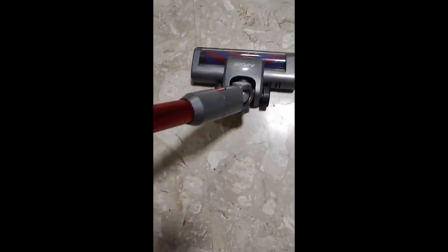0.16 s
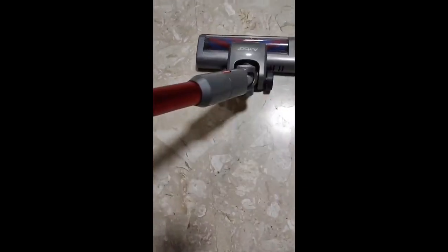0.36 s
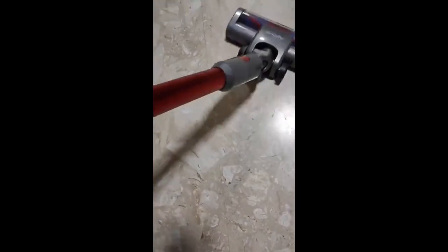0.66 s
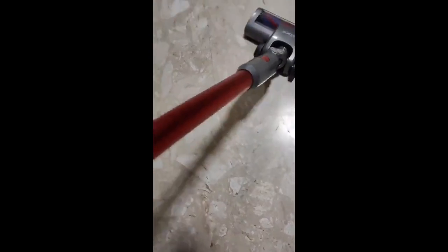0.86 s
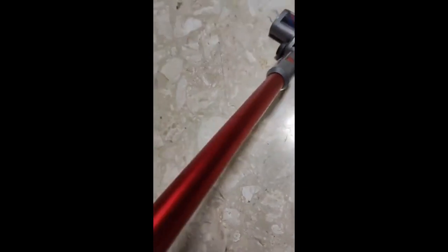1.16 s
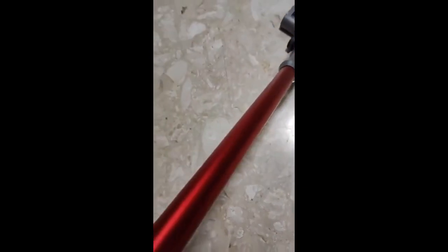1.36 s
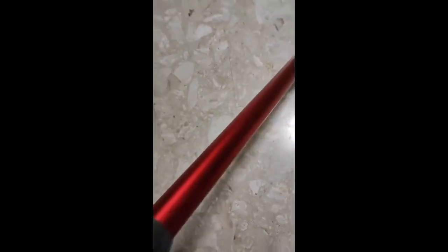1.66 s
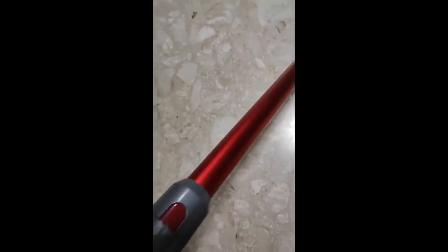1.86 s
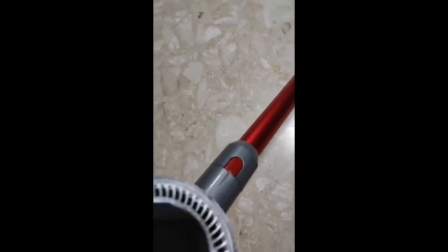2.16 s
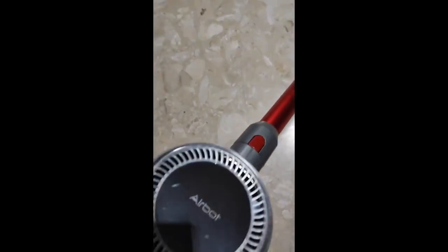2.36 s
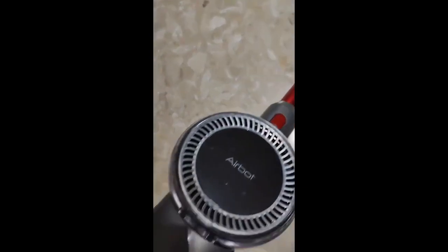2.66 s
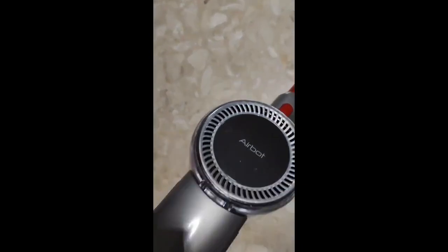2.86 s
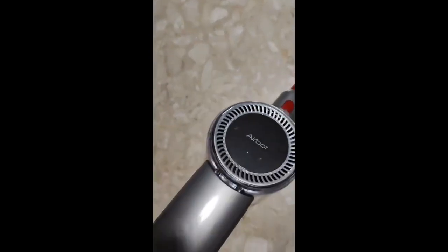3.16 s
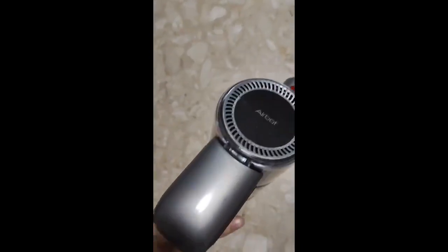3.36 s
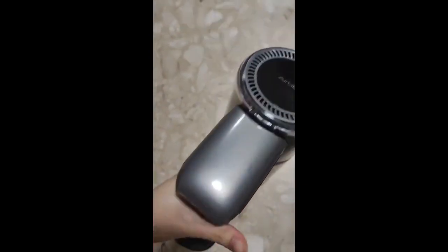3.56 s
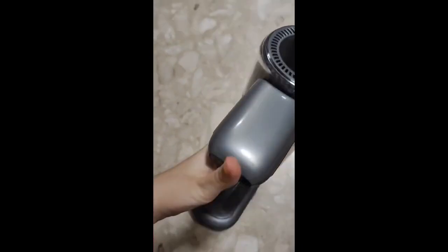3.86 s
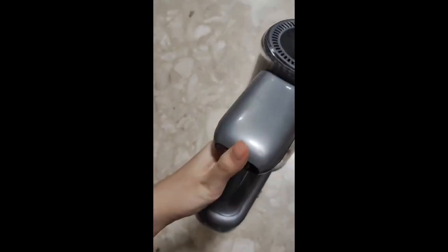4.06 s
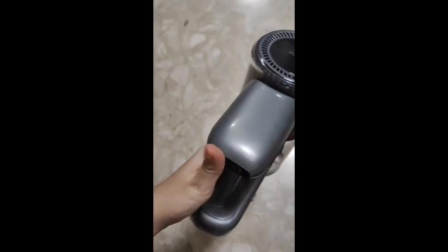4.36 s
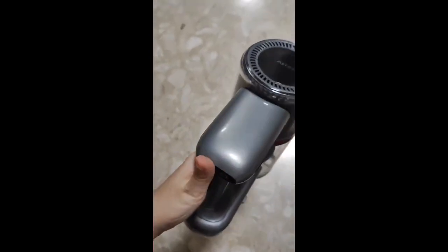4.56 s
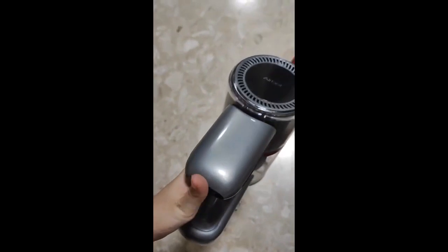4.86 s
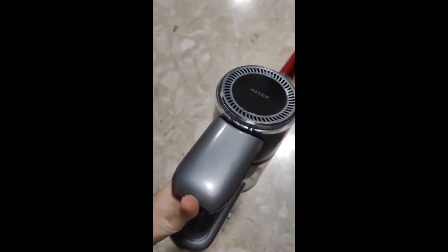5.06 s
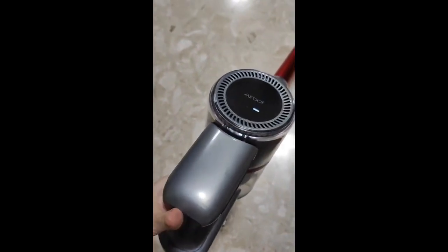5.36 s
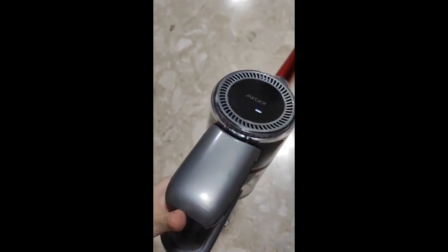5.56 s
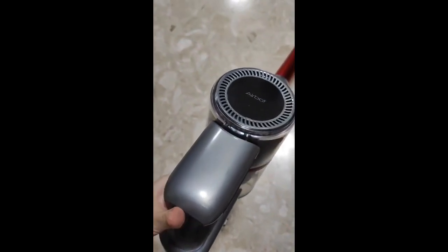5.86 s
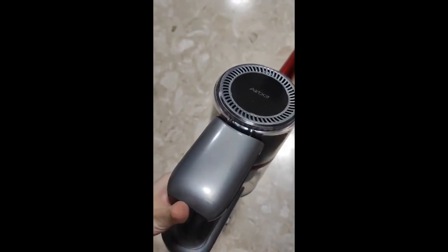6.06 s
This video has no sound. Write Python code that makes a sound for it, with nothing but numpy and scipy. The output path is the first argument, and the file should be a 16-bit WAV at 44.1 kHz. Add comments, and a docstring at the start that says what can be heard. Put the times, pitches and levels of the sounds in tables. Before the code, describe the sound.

A cordless stick vacuum on a hard stone floor indoors. The floor brush is already turning with a low throbbing drone; the suction motor winds up quickly from near silence to a hum and thin whine, holds, then steps to a higher pitch with stronger air rush. A close handheld stereo microphone moves along the wand to the motor.

```python
"""A suction motor spins up in a cordless stick vacuum, settles, then steps to its higher power.
Its unbalanced shaft hums, a seven-blade impeller whines, and the swirl behind it adds wavering tones.
Air rushes and hisses through the machine; a floor brush, already turning, drones and rumbles on stone.
Two microphones move along the wand to the motor; reflections make the tones flutter as they glide."""
import sys
import numpy as np
from scipy import signal
from scipy.fft import rfft, irfft, next_fast_len
from scipy.io import wavfile
from scipy.ndimage import uniform_filter1d, map_coordinates

SR = 44100
rng = np.random.default_rng(int(sys.argv[2]) if len(sys.argv) > 2 else 0)


def generate_wav(sig):
    """Save sig (samples, or channels by samples) to the path in sys.argv[1] as 16-bit PCM at SR."""
    pcm = np.round(np.clip(np.atleast_2d(sig).T, -1, 1) * 32767).astype(np.int16)
    wavfile.write(sys.argv[1], SR, pcm)


N = 274743
TIME = np.arange(N) / SR
LOW_POWER_HZ, HIGH_POWER_HZ = 401.1, 513.6  # shaft turns per second at the two settings


def undb(db):
    """Amplitude gain is ten to the power of decibels over twenty."""
    return 10 ** (np.asarray(db) / 20)


def curves(table):
    """Linear interpolation in time of every column after the first."""
    time_s, *columns = np.transpose(table)
    return [np.interp(TIME, time_s, column) for column in columns]


def over_hz(table, hz):
    """Interpolation of a (frequency, value) table on a logarithmic frequency axis."""
    points, values = np.transpose(table)
    return np.interp(np.log(hz + 1), np.log(points), values)


def walk(rate):
    """Band-limited random fluctuation: spread 1, changing about rate times a second."""
    knots = rng.standard_normal(4096)
    coarse = TIME[::32]
    path = map_coordinates(knots, [coarse * rate], mode="wrap")
    return np.interp(TIME, coarse, path / path.std())


def angle(hz):
    """Phase is the time integral of angular frequency."""
    return 2 * np.pi * np.cumsum(hz) / SR


def tone(phase, db):
    """A sine's peak is the square root of two times its rms level."""
    return np.sqrt(2) * undb(db) * np.sin(phase)


def scattered(phase, db, rate, share, lead=0):
    """A coherent tone, leading on the left, shares its energy with a randomly scattered field."""
    share = np.clip(share, 0, 1)
    sides = []
    for side_phase in (phase + lead, phase):
        in_phase = np.sqrt(2 * (1 - share)) + np.sqrt(share) * walk(rate)
        quadrature = np.sqrt(share) * walk(rate)
        sides.append(in_phase * np.sin(side_phase) + quadrature * np.cos(side_phase))
    return undb(db) * np.array(sides)


def noise(colour, flicker_db, flicker_rate, count=1):
    """Turbulence as partly coherent stereo noise, rms 1, in count flickering bands an octave."""
    # likeness of the two sides of the noise: (frequency_hz, coherence, left_lead_rad)
    likeness = np.array([(30, .7, 0), (120, .98, 0), (300, .95, 0), (550, .85, .3), (850, .55, 1.5),
                         (1100, .55, 2.8), (1650, .5, 3), (1950, .2, 3), (2650, .5, 3.2), (3400, .35, 4.7),
                         (4100, .55, 6.1), (5000, .3, 6.7), (6300, .3, 9), (8000, .1, 11)])
    size = next_fast_len(N, real=True)
    hz = np.arange(size // 2 + 1) * SR / size
    coherence = np.clip(over_hz(likeness[:, [0, 1]], hz), 0, .99)
    lead = over_hz(likeness[:, [0, 2]], hz)
    left, other = rfft(rng.standard_normal((2, size))) * undb(over_hz(colour, hz))
    right = coherence * np.exp(-1j * lead) * left + np.sqrt(1 - coherence ** 2) * other
    sides = np.array([left, right], dtype=np.complex64)
    place = count * np.log2(np.clip(hz, colour[0][0], colour[-1][0]))
    out = 0
    for k in range(int(place[0]), int(place[-1]) + 2):
        weight = np.maximum(1 - abs(place - k), 0).astype(np.float32)  # overlapping triangles
        band = irfft(sides * weight, size)[:, :N]
        out = out + band * undb(flicker_db * walk(flicker_rate))
    return out / out.std()


def pan(db):
    """A level difference, split evenly between left and right gains."""
    return undb(np.array([[db], [-db]]) / 2)


def delayed(side, delay_s):
    """Propagation over a longer path makes a sound arrive later."""
    return np.interp(TIME - delay_s, TIME, side, left=0)


def reflections(x, share, longest_s, sway_ms, count):
    """Multipath interference: count echoes a side, whose path lengths change as the hand sways."""
    echoes = np.zeros((2, N))
    for k in range(2 * count):
        delay_s = rng.uniform(.1, 1) * longest_s + sway_ms / 1000 * walk(2)
        echoes[k % 2] += delayed(x[k % 2], delay_s)
    return (x + share * echoes / np.sqrt(count)) / np.sqrt(1 + share ** 2)


def shaft_speed():
    """First-order lag: the speed nears each power setting exponentially, with a soft-starting step."""
    switch_on_s, spin_up_s = -.035, .375  # start and time constant
    step_at_s, step_ease_s, step_settle_s = 2.378, .087, .175
    creep_at_s, creep_hz_per_s = 4, 0.73  # the speed inches up at the end
    spin_up = 1 - np.exp(-np.maximum(TIME - switch_on_s, 0) / spin_up_s)
    since_step = step_ease_s * np.logaddexp(0, (TIME - step_at_s) / step_ease_s)
    step = 1 - np.exp(-since_step / step_settle_s)
    creep = creep_hz_per_s * np.maximum(TIME - creep_at_s, 0)
    return LOW_POWER_HZ * spin_up + (HIGH_POWER_HZ - LOW_POWER_HZ) * step + creep


def shaft_hum(turn, glide):
    """Rotating unbalance shakes the housing once a turn, a little unsteadily."""
    # hum level at the two microphones, before flicker and echoes: (time_s, left_db, right_db)
    hum_levels = [(0.0, -68, -67), (.17, -58, -55), (0.27, -41, -40), (0.47, -35.5, -25),
                  (0.57, -21.5, -21.5), (1.17, -23.5, -20.5), (1.29, -25.5, -26), (1.79, -26.5, -26.5),
                  (2.4, -19, -19.5), (2.57, -24.5, -24), (2.65, -25, -17), (2.71, -30, -30),
                  (2.89, -25.0, -21), (4.08, -27.5, -25.5), (4.27, -30, -28.5), (4.41, -28.5, -23),
                  (4.67, -40, -24), (5.2, -27, -25), (5.27, -30, -27.5), (6.07, -31, -22), (6.22, -38, -24)]
    left_db, right_db = curves(hum_levels)
    left = tone(turn, left_db + 0.76 * walk(28))
    right = tone(turn, right_db + 0.68 * walk(28))
    echo_share = undb(-40.0) + 0.2 * glide
    return reflections(np.array([left, right]), echo_share, longest_s=0.11, sway_ms=0.78, count=5)


def blade_whine(turn, glide):
    """Blade-passing tone: each blade chops the air, and standing waves and echoes shape the whine."""
    # relative whine level as the microphones pass through standing waves: (time_s, left_db, right_db)
    whine_levels = [(.45, -41, -42), (.6, -41, -40), (.72, -33.5, -33.5), (.82, -31, -34),
                    (.95, -31.5, -32), (1.2, -35, -28), (1.42, -30, -32), (1.48, -35.5, -28),
                    (1.58, -23.5, -24), (1.85, -31.5, -33), (1.97, -30, -26.5), (2.17, -28, -23),
                    (2.24, -28.5, -28), (2.6, -24, -25.5), (2.77, -25.5, -26.5), (3.0, -32, -31.5),
                    (3.2, -28, -27.5), (3.55, -25.5, -27), (3.85, -28.5, -27.5), (3.98, -20.5, -21),
                    (4.33, -33.5, -35), (4.41, -32.5, -33), (4.47, -23.5, -38), (4.56, -24.5, -26.5),
                    (4.67, -29.5, -39), (4.87, -22, -30), (5.01, -17.5, -27), (5.05, -26, -24),
                    (5.12, -22, -22), (5.17, -27, -25), (5.2, -22, -35), (5.26, -20, -23),
                    (5.3, -31.5, -32), (5.39, -23.5, -26), (5.48, -30, -27.5), (5.55, -35, -31),
                    (5.6, -24.5, -43), (5.7, -21.5, -32), (5.8, -27, -31), (5.89, -26, -31),
                    (6.03, -24.5, -30), (6.18, -27, -27.5), (6.23, -22.5, -29)]
    # brief level changes near their nodes: (centre_s, length_s, left_db, right_db)
    nodes = [(1.064, 0.017, -1, -8), (1.359, 0.015, 5, -7), (1.64, 0.05, -8, -16.5),
             (1.707, 0.016, -16, -0.5), (1.807, 0.01, 5, -15), (2.127, 0.032, -5, -12),
             (2.85, 0.018, -12, -3), (2.944, .012, -27.5, -6), (3.063, 0.04, 4.5, -19),
             (3.14, 0.018, -7, 7), (4.233, 0.022, -4, -11), (4.476, 0.035, 0, -15), (4.7, 0.028, 1.5, -10),
             (5.2, .01, 4.5, -15), (5.45, 0.017, -18, 0), (5.75, 0.02, -4, -15), (6, 0.015, 2.5, -12),
             (6.113, 0.027, -7, -5)]
    # phase by which the left side lags the right outside the hollow spells: (time_s, lag_rad)
    whine_lag = [(.7, 2), (.82, 1.3), (.98, 2.3), (1.13, .8), (1.35, 2), (1.5, 1.8), (1.8, 1.6),
                 (2.15, 1.8), (2.4, .9), (3.0, .3), (3.11, 2.2), (3.19, 0), (3.36, 0), (3.42, 1.4),
                 (3.6, 1.6), (3.76, 0), (4.08, 0), (4.18, 1.7), (4.3, 0), (4.62, -.6), (4.72, 1.2),
                 (5.0, 2.3), (5.2, 1.3), (5.45, 1.7), (5.64, 1.2), (5.76, 1.9), (5.88, 1.3), (5.98, 2),
                 (6.1, .3), (6.16, 1.7), (6.23, 4.4)]
    # spells of equal level and opposite phase on the two sides: (start_s, end_s)
    hollow_spells = [(.478, .5), (.547, .568), (.662, .703), (.732, .768), (.873, .903), (.942, .956),
                     (1.002, 1.044), (1.077, 1.094), (1.15, 1.326), (1.383, 1.438), (1.818, 1.862),
                     (3.099, 3.116), (4.17, 4.205), (5.041, 5.178), (5.284, 5.322), (5.466, 5.552),
                     (5.838, 5.855), (5.887, 5.902), (5.935, 5.969), (6.167, 6.202)]
    # late wall echoes: (left_delay_s, right_delay_s, strength in a full glide, 0-1)
    walls = [(.021, .018, .4), (.044, .052, .27)]
    blades, hollow_fade_s = 7, .012
    arrives_s, slowing_s = 3.6, 0.3  # the microphones reach the motor
    crossings_per_s, crossing_db = 15, 1.5  # standing waves crossed on the way

    hollow = sum(1. * ((TIME > start) & (TIME < end)) for start, end in hollow_spells)
    hollow = uniform_filter1d(hollow, size=int(hollow_fade_s * SR))
    sides_db = np.array(curves(whine_levels))
    for centre_s, length_s, left_db, right_db in nodes:
        sides_db += np.outer([left_db, right_db], np.exp(-((TIME - centre_s) / length_s) ** 2))
    even_db = 10 * np.log10(np.mean(undb(sides_db) ** 2, axis=0))  # mean power of the sides
    left_db, right_db = sides_db + hollow * (even_db - sides_db)
    lag, = curves(whine_lag)
    lag = lag + hollow * (np.pi - lag)

    travel = np.clip((arrives_s - TIME) / slowing_s, 0, 1)
    crossing = crossing_db * travel * walk(crossings_per_s)
    flutter = (.7 + glide) * walk(40) + glide * walk(110)
    sides = np.array([tone(blades * turn - lag, left_db), tone(blades * turn, right_db)])
    whine = undb(crossing + flutter) * sides
    # an echo keeps the earlier pitch, so it beats with the direct sound during a glide
    for left_s, right_s, strength in walls:
        echo = np.array([delayed(whine[0], left_s), delayed(whine[1], right_s)])
        share = strength * glide * (1 - hollow)
        whine = (whine + share * echo) / np.hypot(1, share)
    room_share = (.04 + .25 * glide ** 2) * (1 - hollow)
    return undb(1.5) * reflections(whine, room_share, longest_s=0.05, sway_ms=0.15, count=5)


def overtones(hz, turn, power, glide):
    """Resonance: housing modes colour faint shaft harmonics, the higher rougher and treble weaker in glides."""
    # weaker harmonics before the housing; the side difference is left minus right at low power:
    # (shaft_multiple, low_power_db, high_power_db, side_difference_db)
    harmonics = [(2, -44, -51, -8), (3, -42, -47.5, -7), (4, -53, -61, 0), (5, -55, -44.5, 0),
                 (6, -62, -54.5, 0), (9, -61, -61.5, 0), (10, -55, -52, 1), (11, -64, -63, 0),
                 (13, -63, -61, 0), (14, -56.5, -52, 1), (15, -56, -55.5, 1), (17, -69, -73, 0),
                 (18, -69, -72, 0)]
    # housing resonances that the harmonics glide through: (frequency_hz, gain_db)
    housing = [(520, -3.5), (630, 4.5), (730, 5), (800, -2.5), (930, 3), (1100, 4.5), (1190, 0),
               (2600, 2.5), (3100, 7.5), (3300, 8), (3450, 6), (3700, -1), (3950, -1), (5150, 0),
               (5450, 3.5), (5900, 3.5), (6300, 0)]
    left_lead_s = .00024  # the motor's sound reaches the left microphone first
    out = 0
    for multiple, low_db, high_db, side_db in harmonics:
        line_hz = multiple * hz
        treble = np.clip((line_hz - 3500) / 1000, 0, 1)
        power_db = low_db + power * (high_db - low_db)
        db = power_db + over_hz(housing, line_hz) - 3 * glide * treble
        share = .03 + .02 * multiple + .45 * power
        sides = undb(np.outer([1, -1], side_db * (1 - .6 * power)) / 2)
        lead = 2 * np.pi * line_hz * left_lead_s
        out = out + sides * scattered(multiple * turn, db, rate=16 + multiple, share=share, lead=lead)
    return out


def impeller_swirl(turn):
    """Random modulation broadens the tones of the unsteady swirl behind the impeller."""
    # swirl tones: (shaft_multiple, width_hz, relative_level_db)
    swirl_tones = [(1.86, 70.04, -37.5), (5.001, 260.1, -42.5)]
    # level added to them, rising with power, falling as the microphones draw back: (time_s, level_db)
    swirl_level = [(0, -19.5), (2.0, -14.5), (2.5, -2.5), (3.0, 0.5), (4.15, 2), (4.7, -3), (6.23, -2)]
    swirl_db, = curves(swirl_level)
    out = 0
    for multiple, width_hz, db in swirl_tones:
        out = out + scattered(multiple * turn, db + swirl_db, rate=width_hz, share=0.98)
    return out


def airflow():
    """Turbulent flow makes broadband noise: a rush in wand and cyclone, a hiss at the exhaust slots."""
    # relative level of the air: (time_s, rush_db, hiss_db)
    air_levels = [(0, -59, -62.5), (0.55, -44, -49.5), (1.4, -43, -50.5), (2.26, -40.5, -48),
                  (3.0, -38, -45), (4.45, -37.5, -45.5), (4.75, -38, -41.5), (5.9, -40, -44),
                  (6.23, -38, -45)]
    # spectrum of the rush: (frequency_hz, relative_level_db)
    rush_colour = [(110, -27.5), (185, -8), (228, -1), (270, -4), (325, 3), (390, 0), (450, 0.5),
                   (590, -2.5), (760, 3.5), (1000, 3), (1160, -2.5), (1550, 4), (1950, 4), (2300, 0),
                   (2800, 1), (3450, 0.5), (4500, -39)]
    # spectrum of the exhaust hiss: (frequency_hz, relative_level_db)
    hiss_colour = [(2500, -26.5), (3700, 8.5), (4500, 0), (5400, 0.5), (6300, -6.5), (7500, -1),
                   (8300, -25)]
    rush_db, hiss_db = curves(air_levels)
    rush = noise(rush_colour, flicker_db=1.7, flicker_rate=14, count=4)
    hiss = noise(hiss_colour, flicker_db=2.4, flicker_rate=12, count=9)
    return undb(rush_db + 8.5) * rush * pan(0.33) + undb(hiss_db + 6.0) * hiss * pan(1.2)


def floor_brush(power):
    """Amplitude modulation: the brush gear throbs once a turn, slowed by suction load, over roller rumble."""
    # spectrum of the roller's rumble on stone: (frequency_hz, relative_level_db)
    brush_colour = [(20, -21.5), (45, -11), (80, -8.5), (97, -1.5), (118, -9.5), (170, -3.5), (320, -1.5),
                    (500, -10), (720, -6), (1100, -6), (2000, -10), (4000, -38), (8000, -49.5)]
    load = 1 - 0.054 * power  # speed factor
    near = undb(-4.5 * np.minimum(TIME / 2, 1))  # the microphones leave the floor head behind
    throb = 1 + .75 * np.cos(angle(22.4 * load) - 2.2)
    gear = throb * scattered(angle(710 * load), db=-44, rate=22, share=.3, lead=1.2)
    masked = undb(-8 * np.minimum(TIME / .5, 1))  # the brush motor's thin tone soon sinks under the air
    motor_phase = angle(np.full(N, 2470.))
    small_motor = masked * scattered(motor_phase, db=-47.0, rate=2.3, share=0.31, lead=4.5)
    drone = tone(angle(74 + 2.6 * walk(9.8)), -60 + 3 * walk(4.5))
    rumble = undb(-40.0) * noise(brush_colour, flicker_db=1.2, flicker_rate=12) * pan(-0.54)
    return near * (gear + small_motor) + drone + rumble


def buffeting():
    """Pressure fluctuations in stray air bump softly, mainly at the right microphone."""
    # puffs of air, levels as on the right: (centre_s, length_s, level_db)
    puffs = [(3.793, 0.052, -37.5), (3.95, 0.087, -42.5), (5.715, 0.07, -38), (5.805, 0.034, -40),
             (6.027, 0.045, -47), (6.18, 0.058, -45)]
    # spectrum of the puffs: (frequency_hz, relative_level_db)
    puff_colour = [(15, -16), (32, -10.5), (60, -2.5), (95, -5.5), (160, -37.5), (1000, -80)]
    swell = sum(undb(db) * np.exp(-((TIME - s) / length_s) ** 2) for s, length_s, db in puffs)
    eddies = noise(puff_colour, flicker_db=1, flicker_rate=20)
    return swell * eddies * undb(np.array([[-16], [0]]))


def scene():
    """Harmonic locking: one shaft speed drives all the suction motor's tones."""
    hz = shaft_speed()
    turn = angle(hz * (1 + 0.00035 * walk(25)))
    power = np.clip((hz - LOW_POWER_HZ) / (HIGH_POWER_HZ - LOW_POWER_HZ), 0, 1)
    spun_up = np.minimum(hz / 325, 1) ** 4.9
    speed_change = uniform_filter1d(abs(np.gradient(hz)) * SR, size=6000)  # Hz per second
    glide = np.tanh(speed_change / 70)  # 0 at a steady speed, near 1 in a fast run-up
    upper_tones = blade_whine(turn, glide) + overtones(hz, turn, power, glide) + impeller_swirl(turn)
    motor = shaft_hum(turn, glide) + spun_up * upper_tones
    return motor + airflow() + floor_brush(power) + buffeting()


def record(dry):
    """Band limiting: a steep elliptic low-pass removes the top above 8500 Hz."""
    low_pass = signal.ellip(10, .2, 80, 8500, fs=SR, output="sos")
    return signal.sosfilt(low_pass, dry)


dry = scene()
out = record(dry)
generate_wav(out)
```